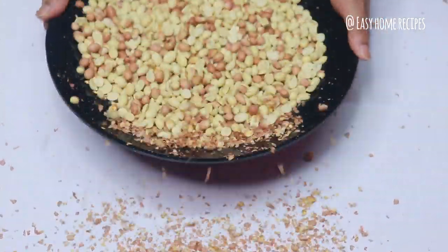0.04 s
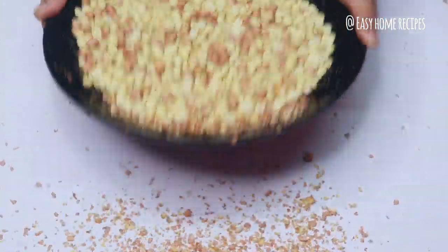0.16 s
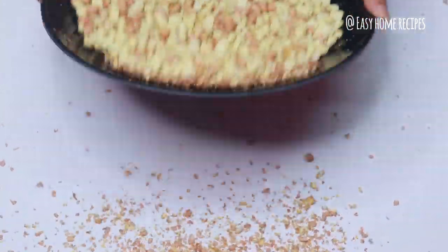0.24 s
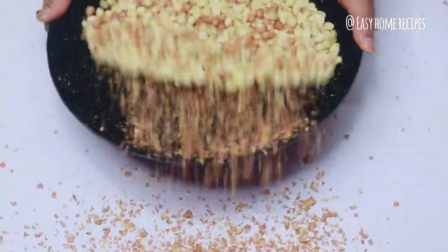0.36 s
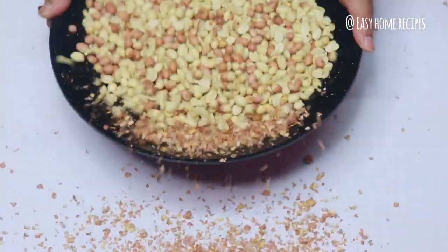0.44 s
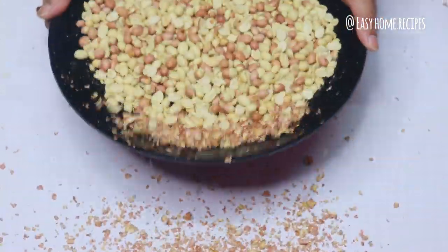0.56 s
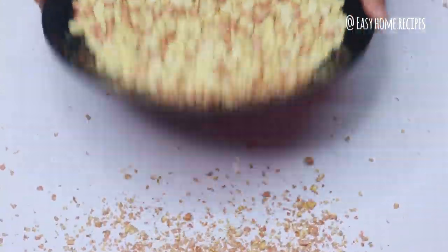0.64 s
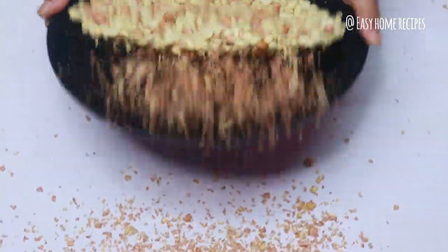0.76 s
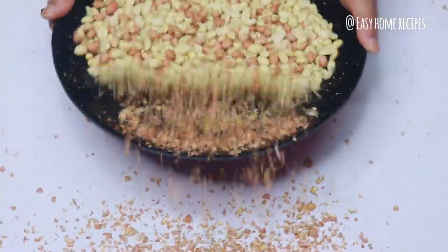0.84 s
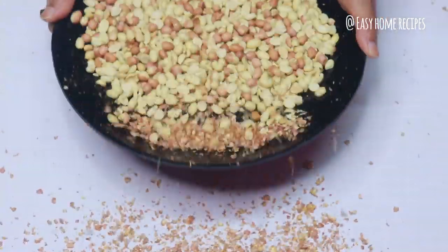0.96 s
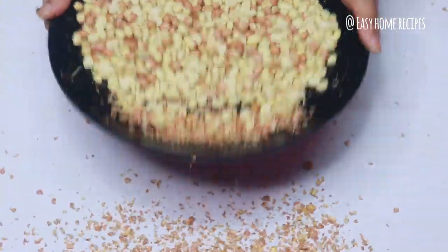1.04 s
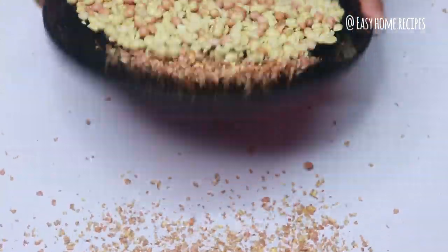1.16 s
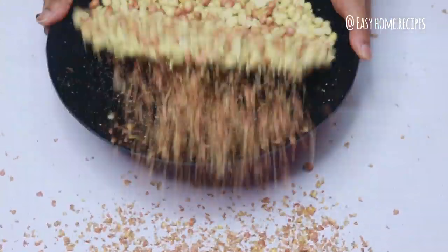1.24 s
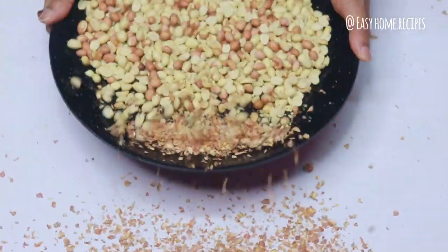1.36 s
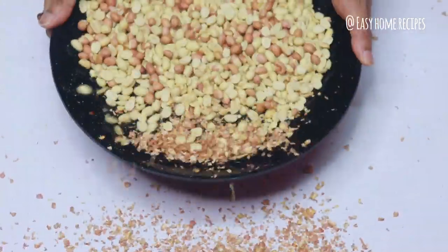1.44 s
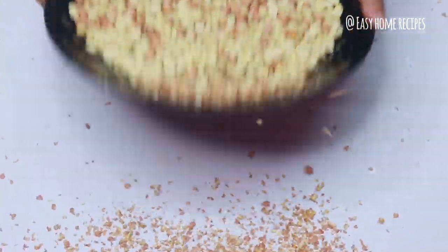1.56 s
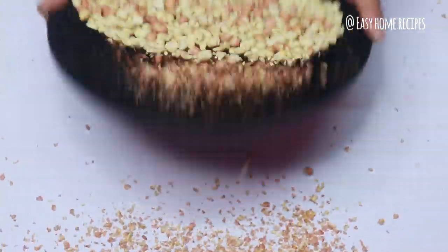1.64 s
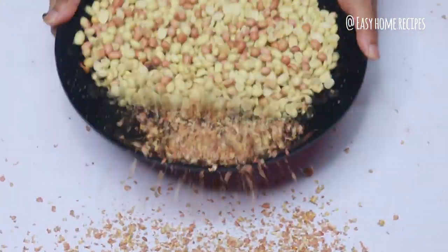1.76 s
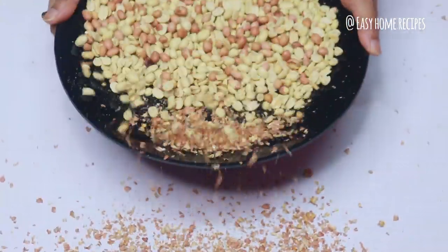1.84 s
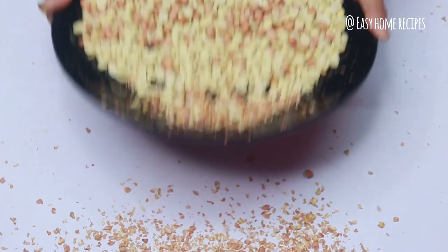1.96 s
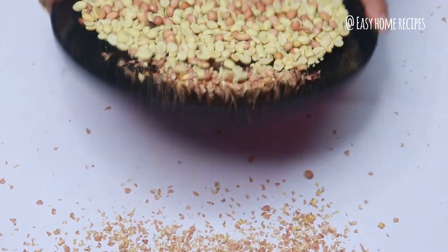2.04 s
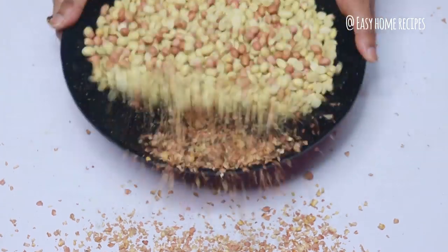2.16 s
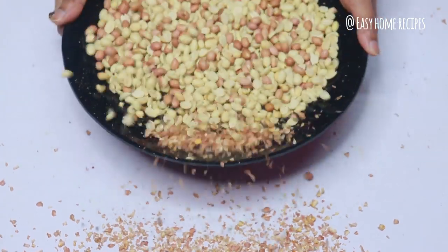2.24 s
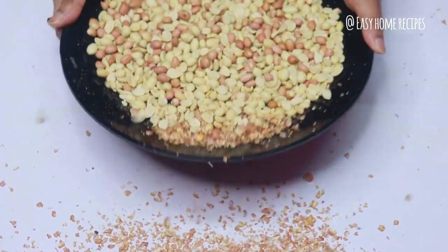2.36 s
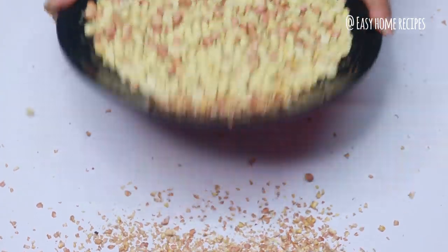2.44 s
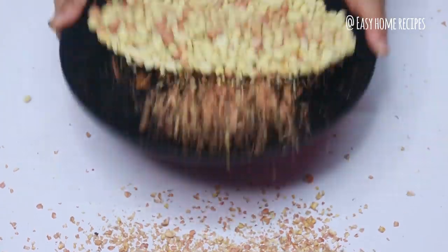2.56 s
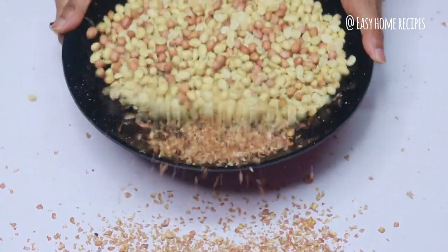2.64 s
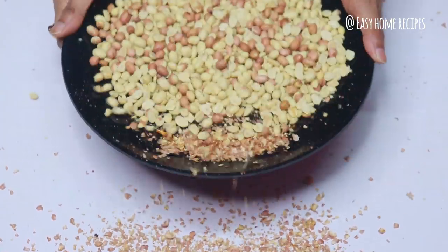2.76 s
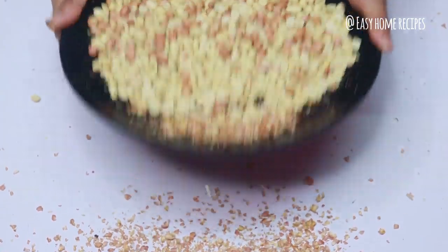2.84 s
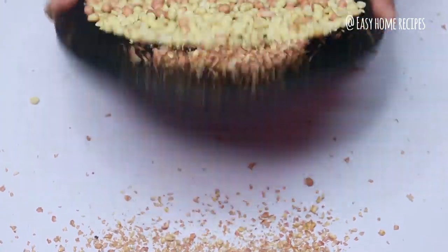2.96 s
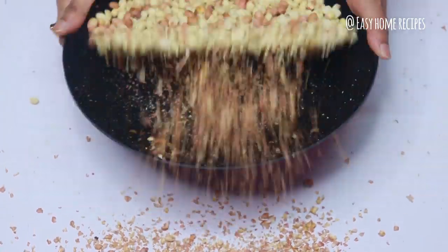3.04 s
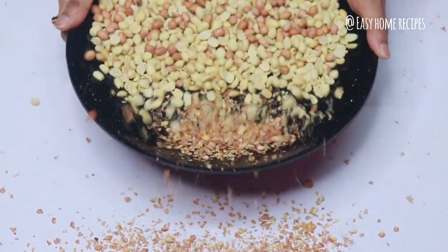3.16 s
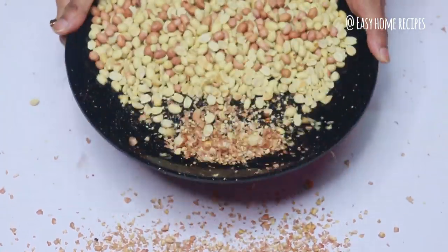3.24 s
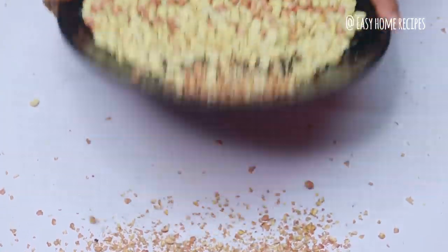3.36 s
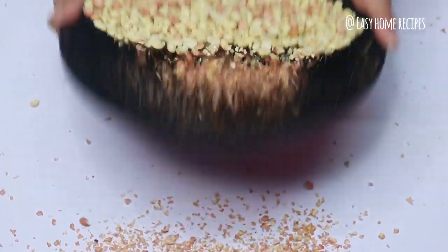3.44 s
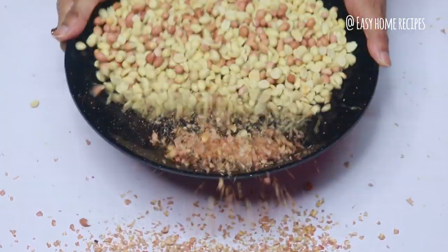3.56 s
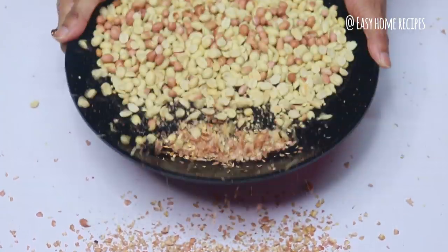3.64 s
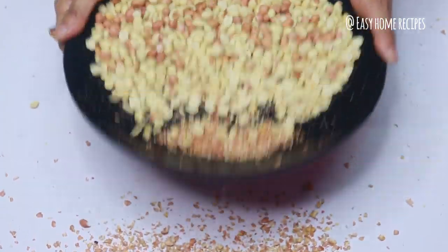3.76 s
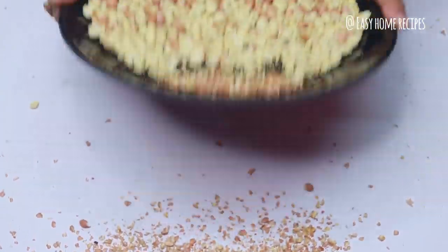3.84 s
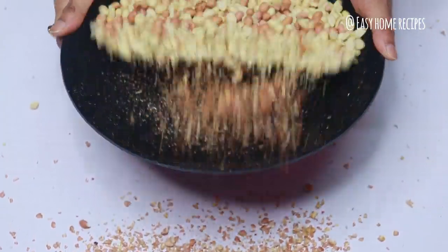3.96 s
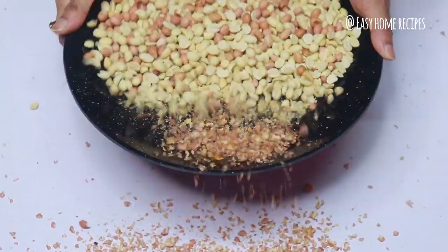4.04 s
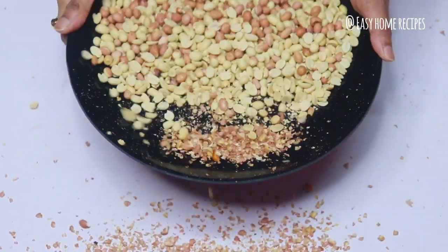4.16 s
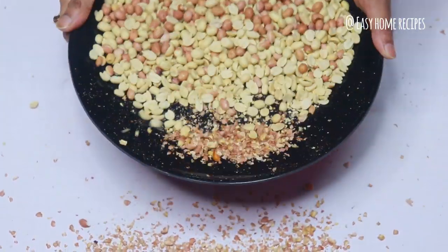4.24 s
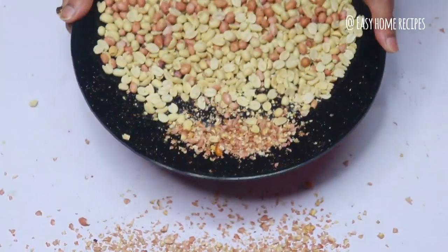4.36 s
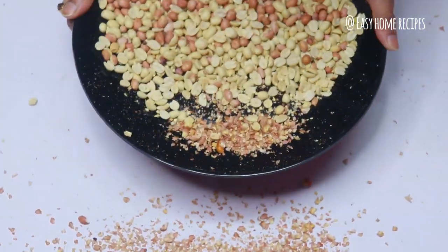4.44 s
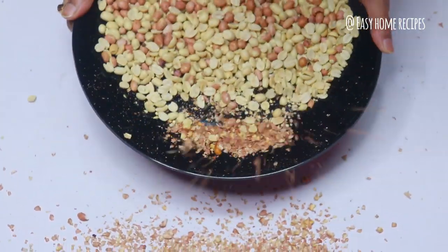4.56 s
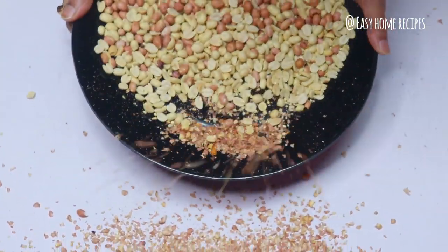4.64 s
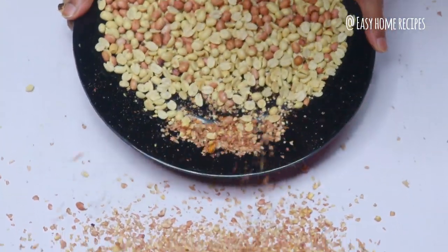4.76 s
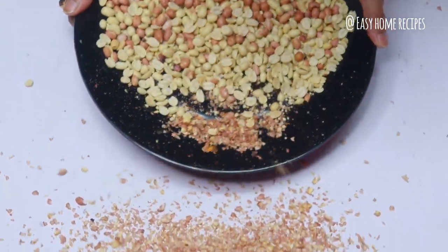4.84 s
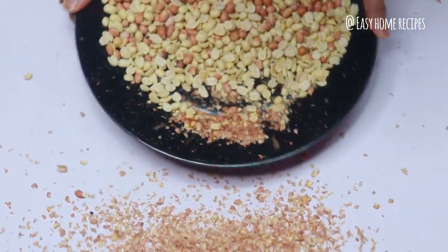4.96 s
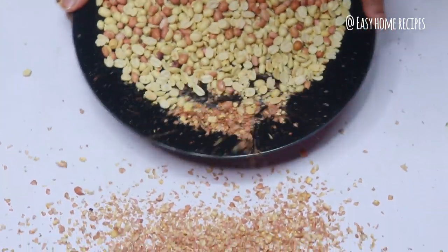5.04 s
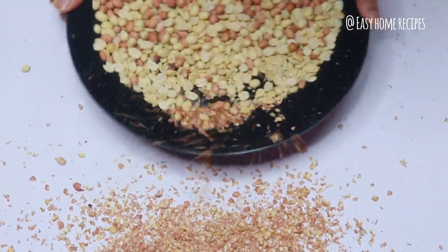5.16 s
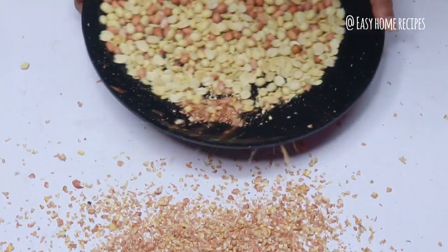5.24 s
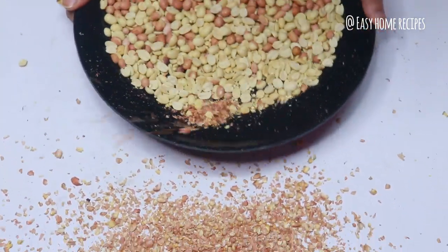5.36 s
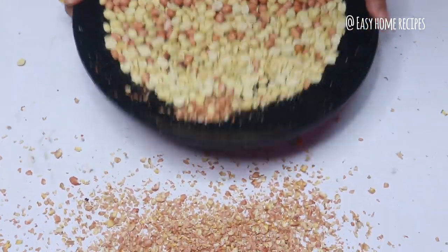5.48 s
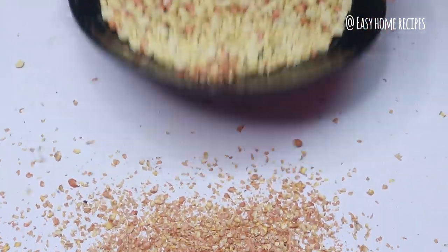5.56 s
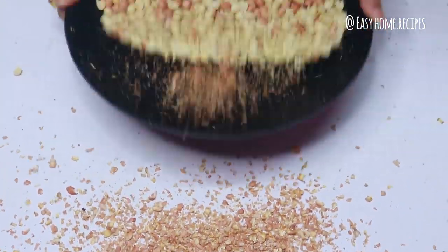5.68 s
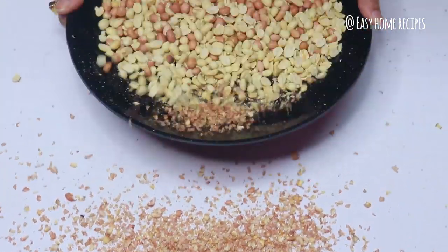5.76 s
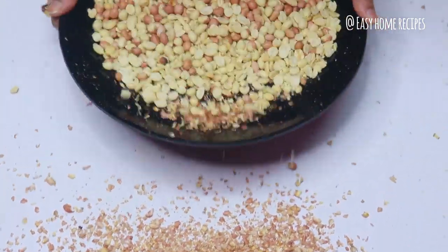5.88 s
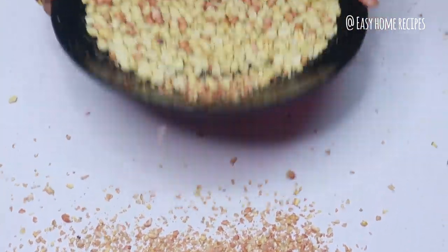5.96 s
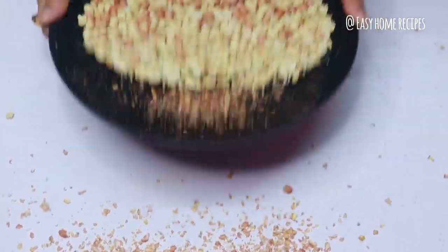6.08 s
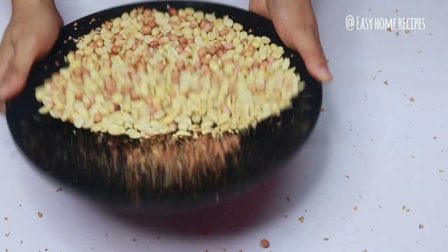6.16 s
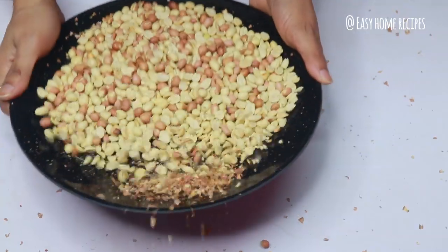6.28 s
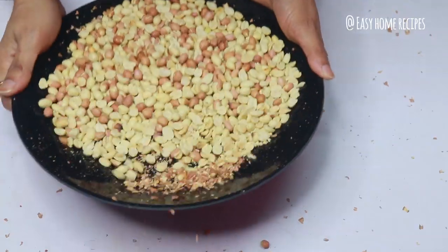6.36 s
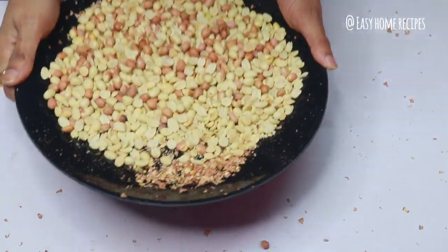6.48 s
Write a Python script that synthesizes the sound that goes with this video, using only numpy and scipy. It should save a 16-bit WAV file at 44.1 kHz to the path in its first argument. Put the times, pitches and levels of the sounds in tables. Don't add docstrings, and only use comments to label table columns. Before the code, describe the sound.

Regular bursts of hard little nuts rattling on a thin ringing plate, each swelling quickly, peaking in a dense clatter and thinning away within a fraction of a second. Tiny high ticks fill the gaps. The rhythm stops for over a second, dry skins sift faintly, the plate knocks twice, and two tosses follow. Close, overloaded phone pickup with short bright kitchen echo over distant traffic rumble.

```python
import sys
import numpy as np
from scipy import signal
from scipy.fft import rfft, irfft
from scipy.io import wavfile
from scipy.ndimage import uniform_filter1d

SR = 44100
rng = np.random.default_rng(int(sys.argv[2]) if len(sys.argv) > 2 else 0)


def dump(signal):
    limited = np.clip(np.atleast_2d(signal).T, -1, 1)
    pcm = np.round(limited * 32767).astype(np.int16)
    wavfile.write(sys.argv[1], SR, pcm)


def voltage_ratio(level):
    return 10 ** (np.asarray(level, float) / 20)


N = 287355
TIME = np.arange(N) / SR
BURST_TIME = np.arange(SR // 8) / SR


def butter(x, hz, kind, order=2):
    return signal.sosfilt(signal.butter(order, hz, kind, fs=SR, output="sos"), x)


def ring(x, hz, width_hz):
    r = np.exp(-np.pi * width_hz / SR)
    feedback = [1, -2 * r * np.cos(2 * np.pi * hz / SR), r * r]
    return signal.lfilter([1, 0, -r], feedback, x) * np.sqrt(1 - r)


def on_log(hz, table):
    f, value = np.transpose(table)
    return np.interp(np.log(hz), np.log(f), value)


def add(out, s, burst):
    i = int(s * SR)
    out[i:i + len(burst)] += burst[:N - i]


def decay(t60):
    return 1000 ** (-BURST_TIME / t60)


def ping(hz, t60):
    return np.sin(2 * np.pi * hz * BURST_TIME) * decay(t60)


def rattle(band_hz, t60):
    return butter(rng.standard_normal(len(BURST_TIME)), band_hz, "band") * decay(t60)


def wander(per_s):
    k = int(SR / per_s)
    held = np.repeat(rng.standard_normal(N // k + 1), k)
    return 2.1 * uniform_filter1d(held, k)[:N]


def swells():
    # centre in seconds, deep level in dB, upper level in dB, length in seconds
    swell_times = [(0.18, -48.5, -50, 0.063), (0.36, -50, -46, .1), (0.6, -57, -61, .12),
                   (0.896, -52.5, -60, 0.067), (1.135, -54, -58, 0.055), (1.454, -46.5, -51, 0.074),
                   (1.87, -57, -55, .1), (2.28, -48, -51, 0.09), (2.797, -44, -57, 0.11),
                   (3.12, -57, -49, 0.12), (3.92, -52, -68, 0.065), (4.194, -41.5, -42, 0.061),
                   (4.357, -42.5, -47, 0.11), (4.56, -53, -45, 0.12), (4.696, -45, -43, 0.066),
                   (4.83, -38.5, -49, 0.046), (5.082, -50.5, -59, .1), (5.355, -54, -50, 0.046),
                   (5.53, -40, -44, 0.077), (5.68, -43, -43, .07), (5.86, -37.5, -45, 0.038),
                   (6.033, -45, -43, 0.068)]
    bed_db = np.array([[-67], [-57.5]])
    flutter_db, flutter_per_s = 2.5, 9
    power = voltage_ratio(2 * bed_db) + np.zeros((2, N))
    for s, deep_db, upper_db, length in swell_times:
        bell = np.exp(-((TIME - s) / length) ** 2)
        power += voltage_ratio(2 * np.array([[deep_db], [upper_db]])) * bell
    return 10 * np.log10(power) + [0 * TIME, flutter_db * wander(flutter_per_s)]


def background():
    # frequency in Hz, hiss density in dB per Hz
    hiss_colour = [(47, -29), (80, 1), (220, -8), (724, -10), (965, -15), (1200, -9), (2040, -14),
                   (3460, -18), (5000, -21), (15500, -29)]
    hiss_db, microphone_db = -53, -81
    deep_db, upper_db = swells()
    deep = ring(ring(rng.standard_normal(N), 53.3, 14), 50.3, 21)
    upper = ring(ring(rng.standard_normal(N), 253, 180), 257, 240) / 10
    rumble = voltage_ratio(deep_db) * deep / deep.std() + voltage_ratio(upper_db - 5.5) * upper
    hz = np.arange(1, N // 2 + 2) * SR / N
    hiss = irfft(rfft(rng.standard_normal(N)) * voltage_ratio(on_log(hz, hiss_colour)), N)
    capsule = voltage_ratio(microphone_db) * butter(rng.standard_normal(N), 9000, "high")
    return rumble + voltage_ratio(hiss_db) * hiss / hiss.std() + capsule


def walls(x):
    # frequency in Hz, reverberation time in seconds
    room_t60 = [(300, 0.4), (1000, 0.43), (3000, 0.41), (7000, 0.37), (14000, 0.3)]
    t = np.arange(SR * 3 // 4) / SR
    band_edges = np.geomspace(200, 17000, num=14)
    tail = np.zeros(len(t))
    for band in zip(band_edges, band_edges[1:]):
        noise = butter(rng.standard_normal(len(t)), band, "band")
        tail += noise * 1000 ** (-t / on_log(band[0], room_t60))
    tail = tail * np.clip(t / 0.0024 - .5, 0, 1)
    return signal.fftconvolve(x, tail / np.sqrt(np.sum(tail ** 2)))[:N]


def skins():
    # time in seconds, level in dB
    sifting = [
        (4.4, -80),
        (4.662, -80),
        (4.678, -67),
        (5.004, -57),
        (5.034, -38),
        (5.14, -51),
        (5.152, -40),
        (5.428, -46),
        (5.44, -63),
    ]
    s, db = np.transpose(sifting)
    level_db = np.interp(TIME, s, db, left=-120, right=-120)
    flakes = (rng.random(N) < .12) * rng.standard_normal(N)
    return voltage_ratio(level_db - 6.0) * butter(flakes, (3000, 11000), "band")


def strays():
    # time in seconds,
    # peak in dB, centre in Hz, body over the tick in dB
    stray_hits = [(0.7328, -41, 8190, 0), (0.7736, -35, 8570, -28), (1.5698, -38.5, 8000, 2),
                  (2.3855, -32, 8420, -15), (2.499, -47, 8020, 9), (2.5493, -48, 8300, 8),
                  (3.2814, -30, 8040, -1), (3.724, -25.5, 8400, -15), (3.82, -32, 9700, -6),
                  (5.4434, -55, 8600, 0), (6.0985, -52, 8540, -6),
                  (0.6604, -32, 14000, 3), (1.1258, -44, 13800, -14), (1.1614, -33, 13900, -12),
             (1.1697, -34, 13600, -2.5), (2.0375, -36, 13500, 0), (2.431, -29, 14200, -5),
             (3.789, -59, 13000, -5.5), (3.8324, -46, 14100, -2), (3.8701, -47, 13300, 1),
             (3.9225, -55, 13900, -2), (6.1569, -48, 13300, -5),
                  (5.035, -40, 7500, 5),
    ]
    out = np.zeros(N)
    for s, db, hz, body_db in stray_hits:
        crack = rng.standard_normal(len(BURST_TIME)) * decay(0.027)
        tick = butter(crack, (.8 * hz, 1.2 * hz), "band")
        body = butter(crack, (1200, 7000), "band")
        add(out, s, voltage_ratio(db) * (0.63 * tick + voltage_ratio(body_db) * body))
    return out


def knocks():
    # time in seconds, peak in dB, edge noise in dB
    rim_hits = [
        (5.4, -14, -32),
        (5.439, -6.5, -25),
    ]
    # mode in Hz, level in dB, 60 dB decay in seconds
    rim_modes = [(322, -23.5, 0.16), (544, -13.5, 0.041), (807, -18.5, 0.12), (1127, -6.5, 0.032),
                 (1284, -1.5, 0.026), (1610, -6, 0.013)]
    out = np.zeros(N)
    for s, db, edge_db in rim_hits:
        thud = voltage_ratio(-19) * ping(222, 0.039)
        body = sum(voltage_ratio(d) * ping(hz, t60) for hz, d, t60 in rim_modes) + thud
        jolt = rattle((950, 1800), 0.13)
        edge = rattle((2000, 5000), 0.086)
        contact = np.minimum(BURST_TIME / 0.00067, 1)
        add(out, s, voltage_ratio(db - 4.0) * (body + 1.05 * jolt + voltage_ratio(edge_db + 1.0) * edge) * contact)
    return out


def heavy_nuts():
    # time in seconds, peak in dB, ring in Hz, spatter over the ring in dB
    heavy_hits = [(0.371, -10, 2680, -36), (0.387, -8, 1360, -18), (0.796, -10.5, 880, -7),
                  (0.812, -1.5, 786, -12), (0.821, 3, 1710, -6), (1.257, -6, 1500, -9),
                  (1.275, 5.5, 1550, -12), (1.691, -22, 2690, -27), (1.717, -5, 1439, -16),
                  (1.734, 0, 1183, -1), (1.755, 5.5, 1380, 0), (2.137, -12, 1780, -5),
                  (2.162, 5, 1500, -10), (2.609, -13.5, 1780, 2), (3.029, -11.5, 1360, -6),
                  (3.057, -14, 813, 6), (3.489, -17, 820, -26), (3.519, -15, 1194, 5),
                  (3.957, -35, 1200, -24), (3.964, -24, 775, -16), (3.978, -2, 1780, -21),
                  (5.558, -17, 1640, -16), (5.699, -6, 1100, -38), (5.713, 1, 1195, -19.5),
                  (5.735, 1, 751, -28), (6.177, -29, 1490, -8)]
    out = np.zeros(N)
    for s, db, hz, spatter_db in heavy_hits:
        spatter = rattle((3500, 9000), 0.021)
        body = butter(ping(hz, 0.0074), 4000, "low")
        add(out, s, voltage_ratio(db - 11) * (body + voltage_ratio(spatter_db) * spatter))
    return out


def tosses():
    # first nuts in seconds, build-up in seconds, full shower in dB, full for seconds,
    # thinning in dB per second
    toss_times = [(-0.12, 0.058, -6.5, 0.037, 203.5), (0.357, 0.052, -9, 0.045, 197),
                  (0.787, 0.063, -9.5, 0.059, 215), (1.244, 0.058, -7.5, 0.054, 198),
                  (1.689, 0.072, -10, 0.053, 186), (2.126, 0.056, -7.5, 0.037, 198),
                  (2.592, 0.055, -7.5, 0.047, 214), (3.026, 0.062, -8.5, 0.06, 197),
                  (3.487, 0.065, -9.5, 0.049, 196), (3.95, 0.066, -10.5, 0.058, 184),
                  (5.681, 0.062, -10.5, 0.039, 246), (6.188, 0.066, -10.5, 0.037, 208.5)]
    # late by seconds,
    # level over the plate band in dB, share of the full time, share of the thinning
    band_shapes = [
        (0.00017, -1, 0.8, 0.98),
        (0.02, -3, 1.045, 0.76),
        (0.015, -3.5, 0.86, 1.125),
    ]
    first_db, build_power = -34, 1.77
    slump_db, slump_s = -5.5, 0.025
    onset_s = 0.0053
    power = np.zeros((3, N))
    for start, build, db, full, fall in toss_times:
        onset = np.clip((TIME - start) / onset_s, 0, 1) ** 2
        for k, (late, over_db, lasts, share) in enumerate(band_shapes):
            to_go = np.clip(1 - (TIME - start) / (build + late), 0, 1)
            after = np.maximum(TIME - start - build - late - lasts * full, 0)
            slump = slump_db * (1 - np.exp(-after / slump_s))
            shape_db = first_db * to_go ** build_power + slump - share * fall * after
            power[k] += onset * voltage_ratio(2 * (db + over_db + shape_db))
    return power


def settles():
    # start in seconds, plate band in dB, middle over it in dB, bright over it in dB,
    # fade in dB per second
    stirs = [(0.24, -49.5, -15, -28, 32), (1.16, -49.5, -6, -5, 150), (2.95, -48, -6, -23, 52),
             (5.58, -46.5, -1, -8, 49), (0.655, -43.5, 5, -3, 150), (0.729, -40, 3, -13, 118),
             (2.075, -37, -14, -18, 150), (2.386, -41.5, 7, 0, 106), (3.72, -38.5, 8.5, 4.5, 132),
             (4.36, -48.5, -20, -33, 94.5), (5.441, -31.5, 4.5, -42, 160), (6.09, -46.5, 3, -7, 150),
             (6.17, -22.5, 2.5, 3.5, 158)]
    power = np.zeros((3, N))
    for s, db, middle_db, bright_db, fall in stirs:
        rise = np.clip((TIME - s) / 0.0064, 0, 1)
        stir = rise * voltage_ratio(db - fall * np.maximum(TIME - s, 0))
        power += (stir * voltage_ratio(np.array([[0], [middle_db], [bright_db]]))) ** 2
    return power


def landing():
    clump_db, clumps_per_s = 1.1, 40
    power = 1e-12 + tosses() + settles()
    return 10 * np.log10(power) + clump_db * np.array([wander(clumps_per_s) for _ in power])


def shower(levels):
    band_centres = (1100, 3500, 8000)
    # frequency in Hz, click density in dB per Hz
    click_colour = [(160, -58), (280, -20), (366, -41), (504, -11), (659, -15), (717, 6.5), (938, 1.5),
                    (1000, 0.5), (1750, 7), (2070, -14), (2700, -3), (4470, -6), (7280, -7.5),
                    (15500, -26.5)]
    # plate resonance in Hz, width in Hz, level in dB
    plate_modes = [(460, 8.3, -36), (505.7, 33, -6.5), (619, 11, -14), (761, 38, 2.5), (829, 41, -4.5),
                   (1202, 76, -7.5), (1332, 104, 1.5), (1780, 135, 6), (2313, 66, -3), (2690, 147, 3.5),
                   (2952, 200, 0.5), (3534, 110, -1.5), (4070, 57, -8.5), (4937, 80, -6), (6100, 116, -5),
                   (7294, 340, -2), (8330, 160, -4), (9410, 300, -8.5)]
    most_per_s, fewest_per_s, thinning = 6000, 900, .35
    spread_db, plate_db, alike = 2.5, -3.5, 0.3
    db = levels[0]
    tilts = [0 * db, levels[1] - db + 3.0, levels[2] - db + 7.0]

    per_s = np.maximum(most_per_s * voltage_ratio(thinning * (db - db.max())), fewest_per_s)
    strength = voltage_ratio(spread_db * np.minimum(rng.exponential(size=N), 3.5))
    hits = (rng.random(N) < per_s / SR) * strength * np.sqrt(SR / per_s)
    hits = hits * voltage_ratio(db) * rng.choice([-1, 1], N)

    modes = [(hz, width_hz, mode_db + plate_db) for hz, width_hz, mode_db in plate_modes]
    for hz in np.geomspace(330, 15000, num=16):
        modes.append((hz, hz / 5.25, on_log(hz, click_colour) + 10 * np.log10(hz / 3000)))
    out = np.zeros(N)
    for hz, width_hz, mode_db in modes:
        place = np.interp(np.log(hz), np.log(band_centres), range(3))
        tilt_db = sum(max(1 - abs(place - k), 0) * tilts[k] for k in range(3))
        drive = hits * voltage_ratio(tilt_db) * (alike + rng.standard_normal(N))
        push = signal.lfilter([hz / SR] * 2, [1, 2 * hz / SR - 1], drive)
        out += voltage_ratio(mode_db) * ring(push, hz, width_hz)
    return voltage_ratio(-6.0) * butter(out, 9840, "low", order=1)


def scene():
    nuts = skins() + strays() + heavy_nuts() + shower(landing())
    near = butter(nuts, 426.6, "high", order=6) + knocks()
    room = voltage_ratio(-10.5) * walls(butter(near, 10400, "low"))
    return (background() + room + near)[None]


def roll_off(x):
    return signal.sosfilt(signal.butter(12, 15640, fs=SR, output="sos"), x)


def record(dry):
    rounded = 2.07 * np.tanh(dry / 1.233)
    mix = np.clip(rounded, -1, 1)
    return roll_off(mix)


dry = scene()
out = record(dry)
dump(out)
```